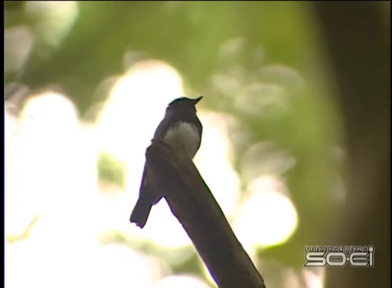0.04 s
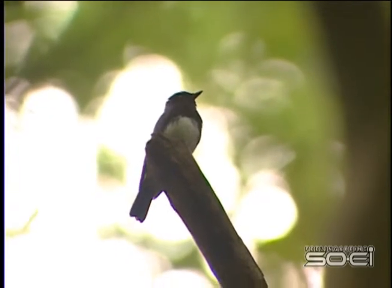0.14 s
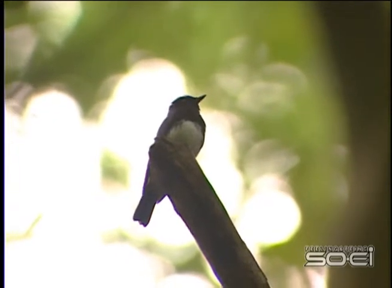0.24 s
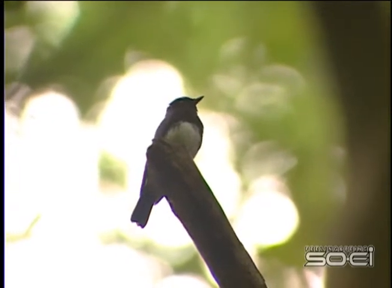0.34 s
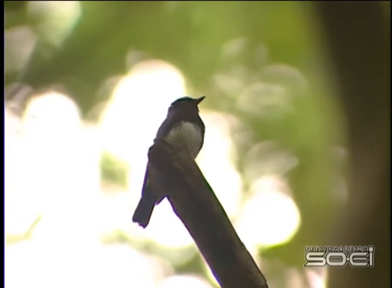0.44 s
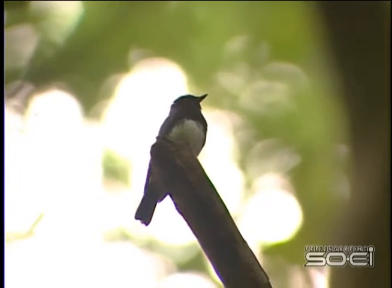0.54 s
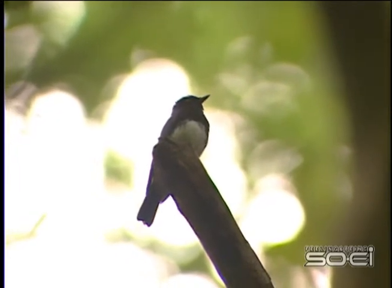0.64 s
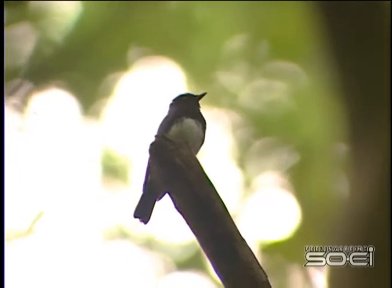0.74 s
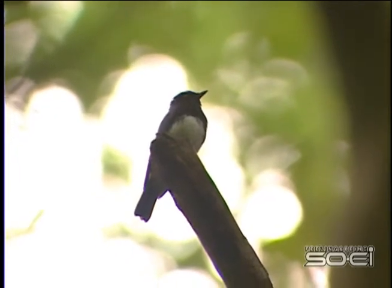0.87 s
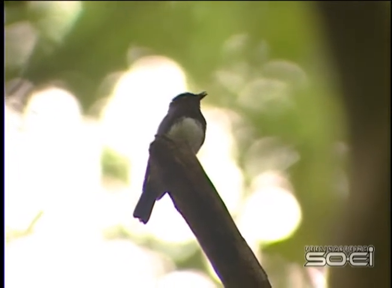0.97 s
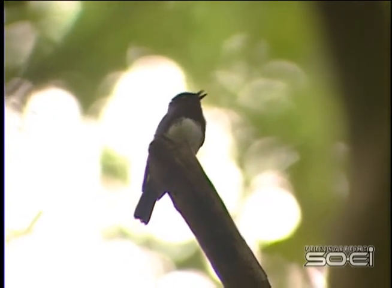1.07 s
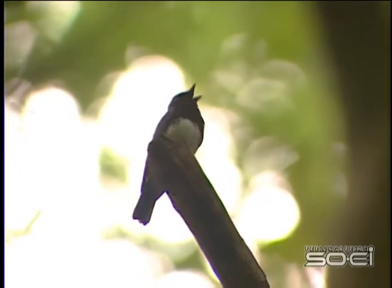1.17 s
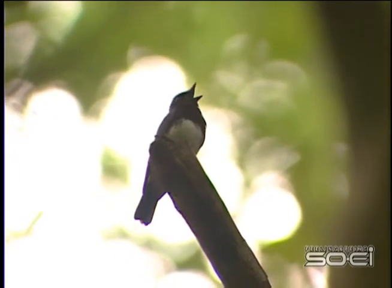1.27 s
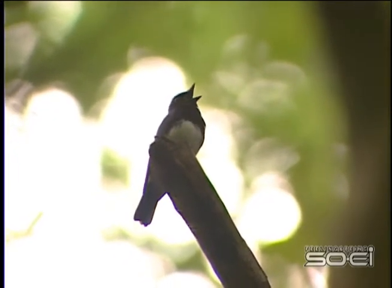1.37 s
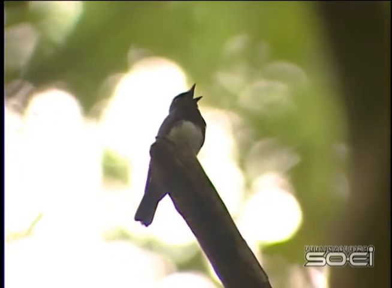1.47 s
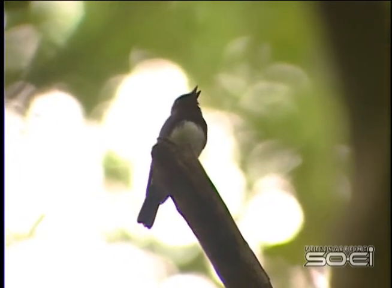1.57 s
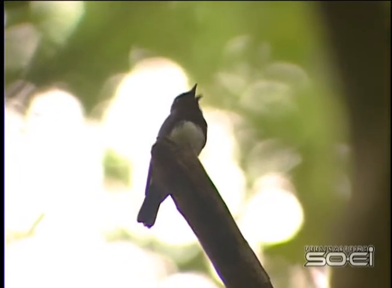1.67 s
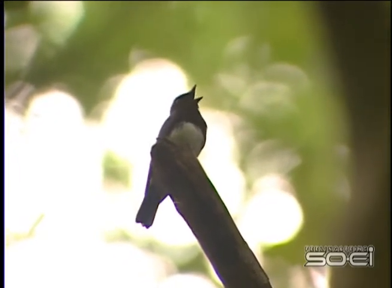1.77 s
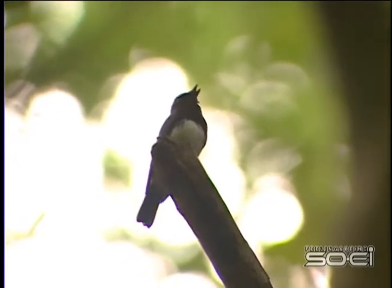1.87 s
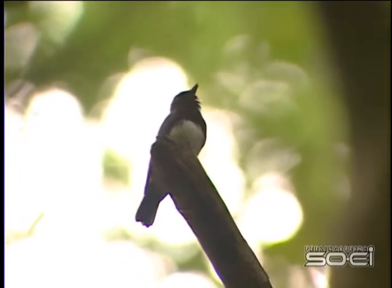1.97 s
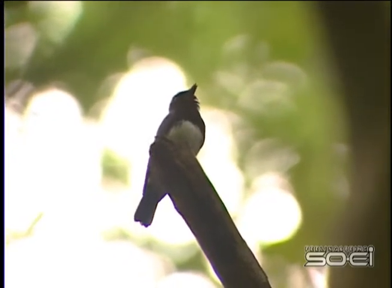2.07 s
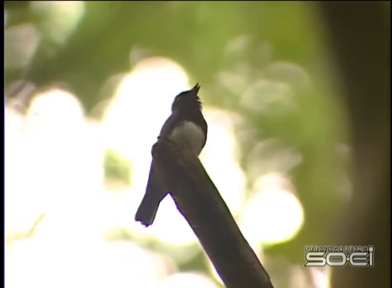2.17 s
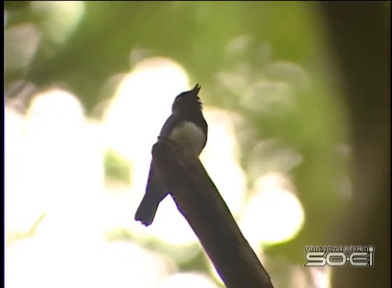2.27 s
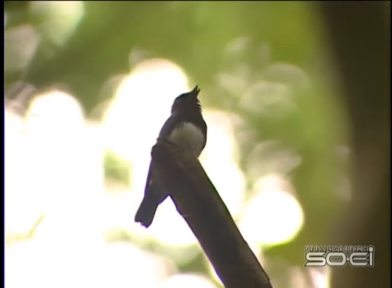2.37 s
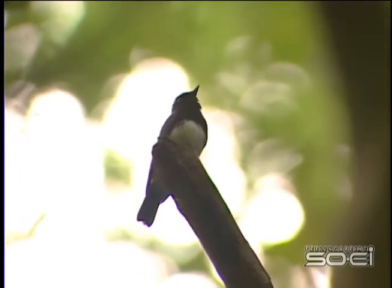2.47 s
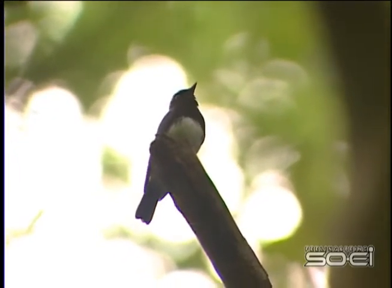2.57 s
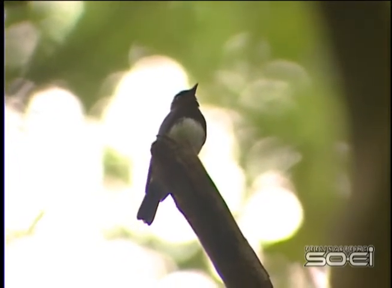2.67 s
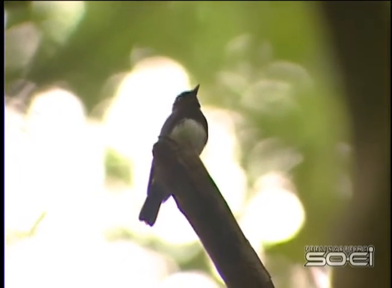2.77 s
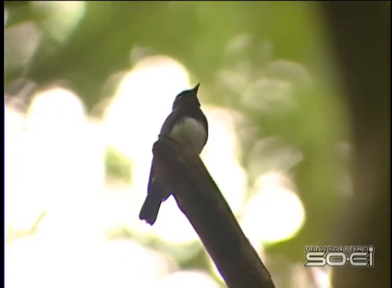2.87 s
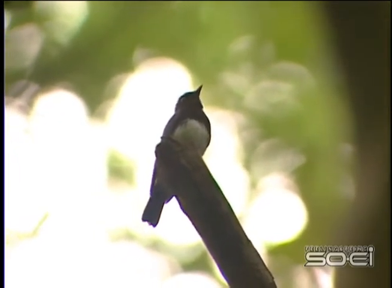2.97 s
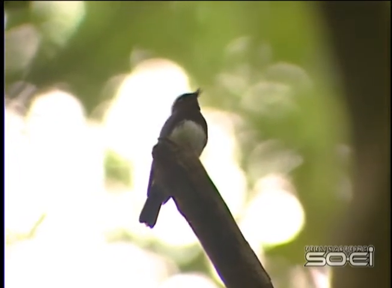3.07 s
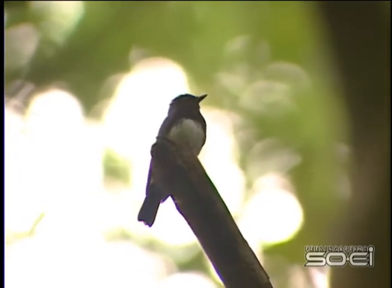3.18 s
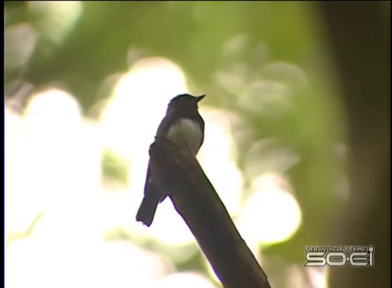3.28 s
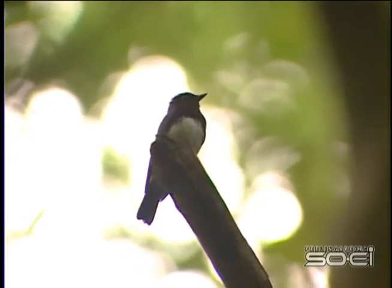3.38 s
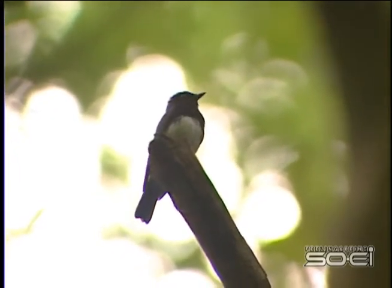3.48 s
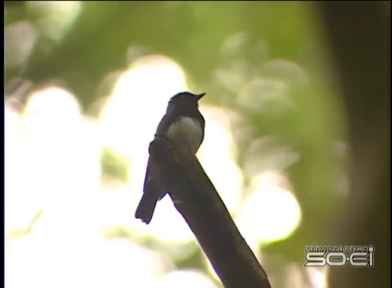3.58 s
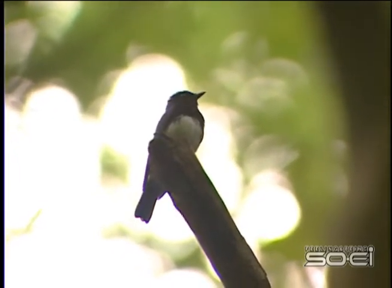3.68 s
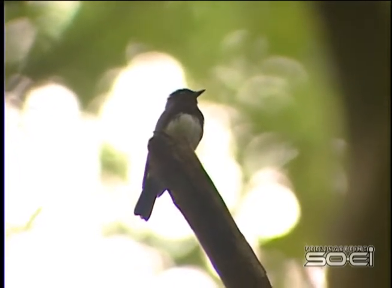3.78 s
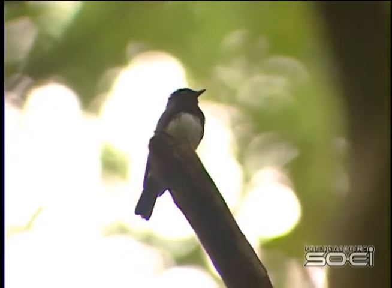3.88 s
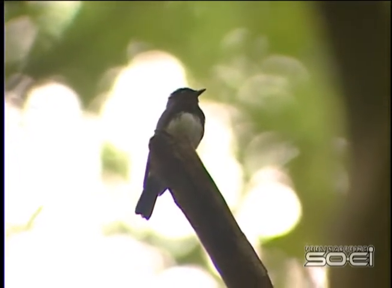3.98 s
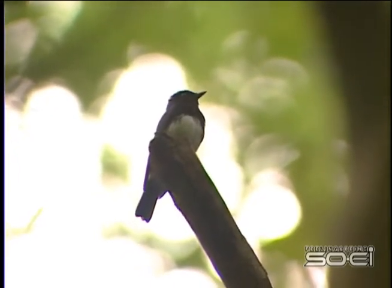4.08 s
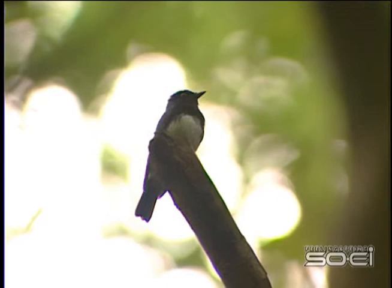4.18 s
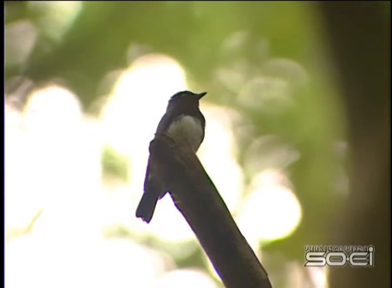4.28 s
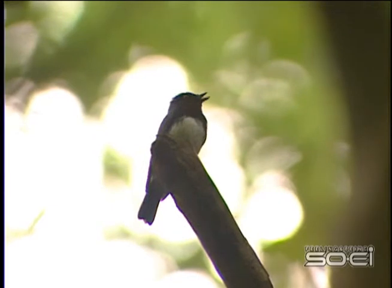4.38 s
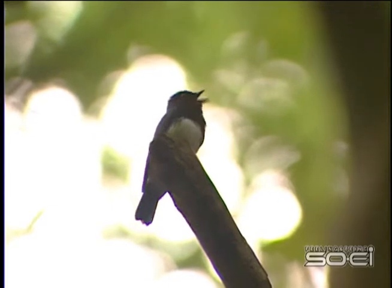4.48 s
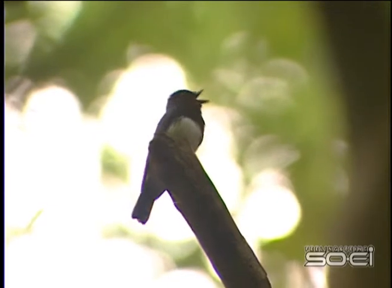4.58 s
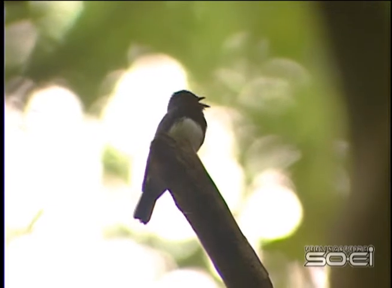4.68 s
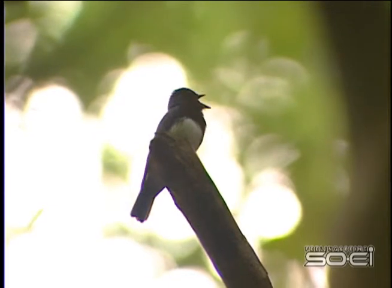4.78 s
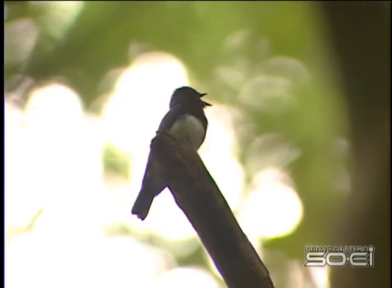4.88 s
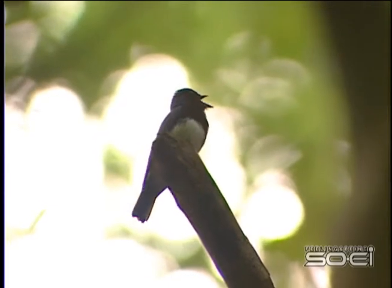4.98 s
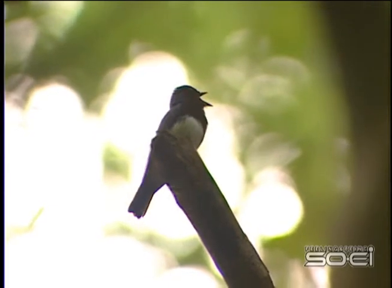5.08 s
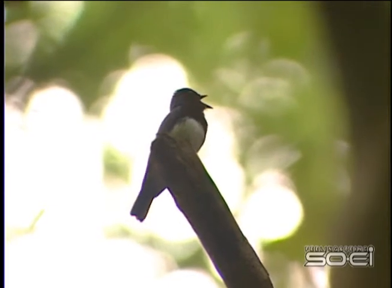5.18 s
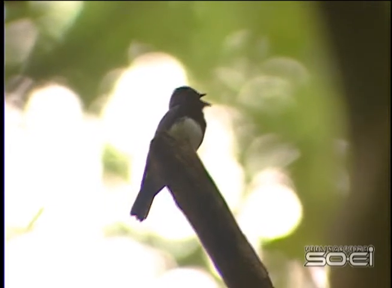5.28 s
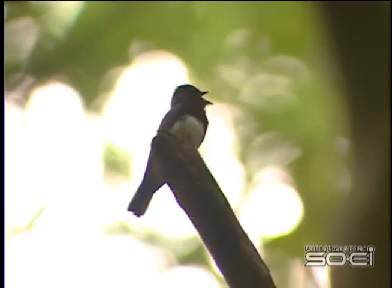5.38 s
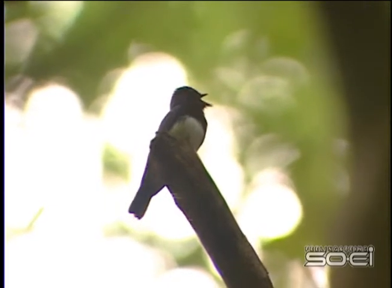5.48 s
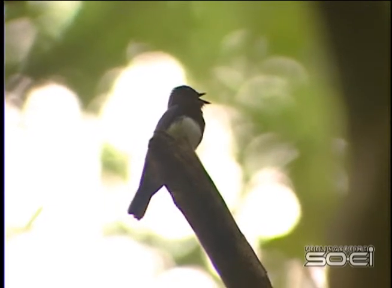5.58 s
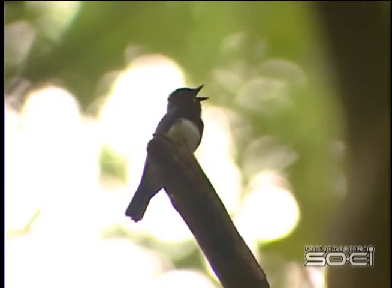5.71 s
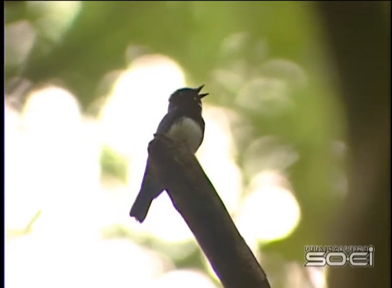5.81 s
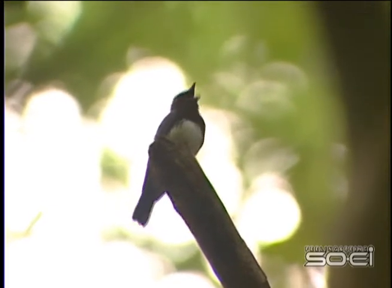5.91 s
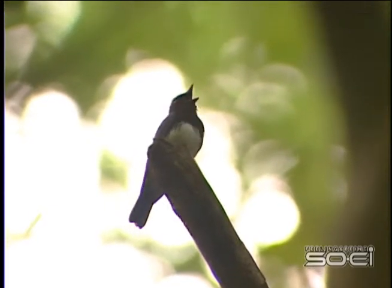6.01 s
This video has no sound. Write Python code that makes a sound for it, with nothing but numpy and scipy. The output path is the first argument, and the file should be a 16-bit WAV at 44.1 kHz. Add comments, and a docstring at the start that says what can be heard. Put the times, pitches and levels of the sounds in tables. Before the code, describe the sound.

A small bird sings in a softly echoing forest: five quick, high rising slurs, then a brief, lower, rough chatter. After a pause it gives five buzzing whistles that step down in pitch. Water gurgles faintly far off under a soft hush, with a few dry ticks. The microphone rumbles and is bumped several times, most clearly during the pause. Nearly everything sits on the left.

```python
"""A flycatcher sings from a forest branch: rising slurs, a low chatter, then five buzzing whistles that
step down. Each note is a gliding near sine from the syrinx, and the trees scatter it into a long tail.
Bubbles gurgle far off and a few dry ticks snap; the microphone rumbles and is bumped a few times.
The forest hush comes up with the input level about a second in. Nearly all the sound sits on the left."""
import sys
import numpy as np
from scipy import signal
from scipy.fft import rfft, irfft
from scipy.io import wavfile
from scipy.ndimage import uniform_filter1d, map_coordinates

SR = 44100
rng = np.random.default_rng(int(sys.argv[2]) if len(sys.argv) > 2 else 0)


def write(x):
    x = np.atleast_2d(x).T
    wavfile.write(sys.argv[1], SR, np.round(np.clip(x, -1, 1) * 32767).astype(np.int16))


N = 266672
TIME = np.arange(N) / SR

# Table levels are relative, ahead of the mix gains.
# rising slurs: start_s, climb_s, hold_s, start_hz, top_hz, level_db, sag_db, accent_db
SLURS = [(1.232, 0.11, 0.0043, 3493, 4840, -35.5, -2, -3), (1.344, .012, 0.0019, 3484, 4987, -31, 11, 9),
         (1.411, 0.065, 0.0056, 3680, 5230, -32, -0.5, 7), (1.557, .063, 0.014, 3777, 5220, -32.5, -1, 3),
         (1.777, .156, 0.0055, 3155, 5080, -30, 3, 0.5)]
# chips of the chatter: start_s, length_s, start_hz, end_hz, level_db
CHIPS = [(2.074, 0.012, 2750, 3880, -35), (2.082, 0.019, 2950, 2500, -36), (2.095, 0.013, 3750, 2430, -40),
         (2.186, 0.023, 3046, 2804, -40.5), (2.229, 0.023, 3085, 3615, -35), (2.252, .011, 3210, 2610, -32),
         (2.271, 0.0119, 2870, 3625, -32), (2.282, 0.0113, 2500, 3170, -41.5),
         (2.295, 0.028, 3222, 3354, -30.5), (2.32, .014, 2395, 3730, -32.5), (2.341, 0.01, 3170, 2370, -40),
         (2.375, .019, 3260, 2924, -32)]
# buzzing whistles: start_s, length_s, base_hz, scoop_hz, rise_hz, hook_hz, level_db, hook_db,
# trill_depth_hz, trill_rate_hz
WHISTLES = [(4.59, .128, 3812, 695, 597, -280, -29, -1, 24, 120.8),
            (4.811, 0.17, 3800, 90.5, 213, 56, -27.5, 5, 95, 107),
            (5.085, 0.19, 3740, 207.4, 245, 139, -27.5, 4.5, 109.8, 103.6),
            (5.372, .211, 3649, 119.5, 182.4, 311, -27.5, 3, 144, 96.36),
            (5.69, 0.19, 3525, 100, 299.5, 135, -29, 6.5, 116, 88.7)]
# overtones of the song: multiple, level_db
OVERTONES = [(2, -43), (3, -42.5), (4, -48)]
# the open beak favours the upper treble: frequency_hz, gain_db
OPEN_BEAK_EQ = [(5400, -0.5), (7500, 5), (10300, 11), (11800, 6.5), (15000, 9)]
# with the head lowered the beak favours the third harmonic: frequency_hz, gain_db
LOWERED_BEAK_EQ = [(5000, -0.5), (7800, -3.5), (11800, 3.5), (15000, -1)]
# rush of air in the song: frequency_hz, gain_db
BREATH_EQ = [(1000, -30), (2500, -3.5), (4000, 18.5), (6000, 4), (9000, -5.5), (12000, -1.5), (15000, -9.5)]
# early reflections off the nearest trunks: delay_s, gain_db
TRUNK_ECHOES = [(.012, -18.5), (.025, -17.5), (.037, -36.5), (0.052, -9.5)]
# the loudest water drops: start_s, level_db, pitch_hz
DROPS = [(1.146, -54, 1000), (1.193, -52, 918), (1.701, -54.5, 1030), (2.411, -52.5, 1110),
         (2.578, -53.5, 963), (2.75, -49, 930), (2.822, -47, 895), (3.965, -48, 870), (4.532, -53, 1056),
         (5.235, -49.5, 770), (5.756, -53.5, 1080)]
# soft thumps on the microphone mount: start_s, level_db, cutoff_hz
THUMPS = [(.866, -30, 55), (1.274, -29.5, 70), (1.407, -27.5, 49), (1.972, -17, 58.6), (2.228, -25, 121),
          (4.05, -17, 84), (4.506, -28, 59)]
# modes of the mount: pitch_hz, level_db, t60_s
MOUNT_MODES = [(31.97, 0.5, 0.44), (59.5, -3, 0.36), (124.6, 0.5, 0.11)]
# light knocks on the microphone housing: start_s, level_db, cutoff_hz, ring_time_ratio
KNOCKS = [(.54, -51, 900, 1.34), (.854, -46, 1000, .7), (0.893, -29, 1300, 1.09), (4.151, -15.5, 220, 0.37)]
# modes of the housing: pitch_hz, level_db, t60_s
HOUSING_MODES = [(143, -8, .1), (245, -12, 0.13), (412, -5, 0.042)]
# faint dry ticks: start_s, level_db
TICKS = [(0.344, -63), (0.541, -61), (0.894, -60.5), (2.462, -43.5), (4.104, -48)]
# colour of the ticks: frequency_hz, gain_db
TICK_EQ = [(300, -52), (1500, 12.5), (4000, 10), (7000, 7), (14000, -27)]
# swells of the rumble, ahead of its ceiling: time_s, level_db
RUMBLE_ENVELOPE = [(0.0, -45.5), (0.18, -59), (0.64, -44), (1.46, -31.5), (1.87, -44), (1.99, -23),
                   (2.21, -40), (2.26, -26.5), (2.63, -40.5), (3.49, -42), (3.71, -33.5), (4.01, -42.5),
                   (4.08, -11), (4.11, -30), (4.28, -49), (4.55, -35.5), (4.85, -47.5), (6.05, -37.5)]
# colour of the rumble: frequency_hz, gain_db
RUMBLE_EQ = [(12, -13.5), (22, -3.5), (38, 8.5), (56, 5), (72, -8.5), (92, -13), (134, -19.5), (165, -35.5),
             (300, -43), (660, -100)]
# colour of the forest air: frequency_hz, gain_db
AIR_EQ = [(50, -5), (95, 11.5), (135, 8.5), (180, 3), (220, 1.5), (300, -3), (410, -3.5), (600, -7),
          (740, -8), (900, -7.5), (1210, -9), (1600, -6.5), (2540, -11), (5000, -12.5), (8000, -18.5),
          (15500, -26)]
# steady hiss of the input: frequency_hz, gain_db
HISS_EQ = [(25, -17.5), (60, -6.5), (90, 3), (125, -19), (220, -12.5), (1000, -17), (2000, -22.5),
           (4500, -26.5), (9000, -31.5), (15000, -50)]
# sensitivity of the right channel against the left: frequency_hz, gain_db
WEAK_SIDE_EQ = [(30, -45), (120, -51.5), (300, -37), (800, -25), (4000, -24.5), (12000, -25)]


def flycatcher():
    """The opening is sung up into the canopy, so it sounds wetter; the whistles with the head lowered."""
    return (forest(from_db(-4.5) * slurs(), scatter_db=-3.5, tail_db=-1.0, scatter_t60_s=0.21)
            + forest(from_db(-8.0) * chatter(), scatter_db=4.0, tail_db=-11.0, scatter_t60_s=0.66)
            + forest(from_db(-4.0) * whistles(), scatter_db=-4.0, tail_db=-3.0, scatter_t60_s=0.37))


def slurs(bow=.7, accent_s=.015):
    """Each slur sweeps up, slows towards its top, holds there a moment and flicks down."""
    out = np.zeros(N)
    for start_s, climb_s, hold_s, start_hz, top_hz, db, sag_db, accent_db in SLURS:
        t, bend_hz, shape_db = gesture(climb_s + hold_s, attack_s=.019, flick_s=.017,
                                       fall_hz=1795, fade_db=23)
        progress = np.minimum(t / climb_s, 1)
        hz = start_hz + (top_hz - start_hz) * progress ** bow + bend_hz
        accent = accent_db * np.exp((progress - 1) * climb_s / accent_s)
        sag = sag_db * np.exp(-((progress - .68) / .18) ** 2)   # the voice slackens or firms on the way
        level_db = db + shape_db + accent - sag
        add(out, start_s, note(hz, level_db, overtone_db=8.0, wander=0.0085, grain=0.19))
    return breathy(eq(out, OPEN_BEAK_EQ), breath_db=-26.0)


def chatter(edge_drop_db=5):
    """Quick rough chips, each a straight glide that is loudest in its middle."""
    out = np.zeros(N)
    for start_s, length_s, start_hz, end_hz, db in CHIPS:
        progress = np.linspace(0, 1, int(length_s * SR))
        hz = start_hz + (end_hz - start_hz) * progress
        arch_db = db - edge_drop_db * (2 * progress - 1) ** 2
        add(out, start_s, note(hz, arch_db, overtone_db=2.0, wander=0.031))
    return breathy(out, breath_db=-18.5)


def whistles(scoop_s=.03, hook_s=.0113, swell_db=3.5, trill_fade=.44, tremolo_db_per_hz=.0011):
    """Each whistle scoops down, rises, swells and hooks on a last push; a fast trill makes it buzz."""
    out = np.zeros(N)
    for start_s, length_s, base_hz, scoop_hz, rise_hz, hook_hz, db, hook_db, depth_hz, rate_hz in WHISTLES:
        t, bend_hz, shape_db = gesture(length_s, attack_s=.025, flick_s=.013, fall_hz=1526, fade_db=33.5)
        progress = np.minimum(t / length_s, 1)
        scoop = np.exp(-t / scoop_s)
        rise = progress ** 2.5
        hook = np.exp((progress - 1) * length_s / hook_s)
        jittered_hz = rate_hz * (1 + .049 * drift(260)[:len(t)])
        swing = np.sin(2 * np.pi * np.cumsum(jittered_hz) / SR)
        trill_hz = depth_hz * (1 - trill_fade * rise ** 2) * swing
        hz = base_hz + scoop_hz * scoop + rise_hz * rise + hook_hz * hook + trill_hz + bend_hz
        accent_db = swell_db * (progress - .5) + hook_db * hook
        level_db = db + shape_db + accent_db - tremolo_db_per_hz * trill_hz
        add(out, start_s, note(hz, level_db, overtone_db=11.0, wander=0.0083))
    return breathy(eq(out, LOWERED_BEAK_EQ), breath_db=-31)


def gesture(length_s, attack_s, flick_s, fall_hz, fade_db, onset_db=-11.5):
    """A note's soft attack and closing downward flick: returns time, pitch bend and level envelope."""
    t = TIME[:int((length_s + flick_s) * SR)]
    onset = np.maximum(1 - t / attack_s, 0)
    flick = np.maximum(t - length_s, 0) / flick_s
    shape_db = onset_db * onset - fade_db * flick ** .59   # drops fastest as the flick begins
    return t, -fall_hz * flick, shape_db


def note(hz, db, overtone_db, wander, grain=0.38, edge_s=.0007):
    """One note from the syrinx: a near sine that follows a pitch and a level, wavering slightly."""
    t = TIME[:len(hz)]
    waver_knots, flicker_knots = rng.standard_normal((2, 400))
    waver = map_coordinates(waver_knots, [t * 260], order=2, mode="wrap")
    phase = 2 * np.pi * np.cumsum(hz * (1 + wander * waver)) / SR
    overtones = sum(from_db(level_db + overtone_db) * np.sin(multiple * phase)
                    for multiple, level_db in OVERTONES)
    # the weak overtones come and go, which makes them husky
    husk = 0.38 + grain * np.interp(t * 900, np.arange(400), flicker_knots)
    tone = np.sin(phase) + husk * overtones
    edges = np.clip(np.minimum(t, t[-1] - t) / edge_s, 0, 1)
    return np.sqrt(2) * tone * edges * from_db(db)


def breathy(song, breath_db):
    """Layer in a faint rush of air that follows the song's envelope."""
    envelope = np.sqrt(np.abs(uniform_filter1d(song ** 2, size=200)))
    return song + from_db(breath_db) * envelope * noise(BREATH_EQ)


def forest(x, scatter_db, tail_db, scatter_t60_s, tail_t60_s=.93, build_s=.0039):
    """Stereo forest reverb: direct sound, trunk echoes, quick scatter from the leaves and a long tail."""
    t, sides = TIME[:2 * SR], []
    for near, far in rng.standard_normal((2, 2, len(t))) * (1 - np.exp(-t / build_s)):
        scatter = from_db(scatter_db) * rms_one(near * from_db(-60 * t / scatter_t60_s))
        tail = from_db(tail_db) * rms_one(far * from_db(-60 * t / tail_t60_s))
        response = (scatter + tail) / np.sqrt(len(t))
        response[0] = 1   # direct sound
        for delay_s, db in TRUNK_ECHOES:
            add(response, delay_s, from_db([db]))
        sides.append(signal.fftconvolve(x, response)[:N])
    return np.array(sides)


def water(faint_count=130, from_s=.96, span_s=5.0, attack_s=.00069, t60_s=.047):
    """Distant gurgles: bubbles ring briefly and rise in pitch, a few loud ones among many faint."""
    bubbles = list(DROPS)
    for when, size, pitch in rng.random((faint_count, 3)):
        octaves = .99 * (pitch - .5) * (1 - size / 2)
        bubbles.append((from_s + span_s * when, -66 + 10 * size ** 2, 1000 * 2 ** octaves))
    t, out = TIME[:SR // 8], np.zeros(N)
    envelope = from_db(-60 * t / t60_s) * (1 - np.exp(-t / attack_s))
    for start_s, db, hz in bubbles:
        chirp = np.sin(2 * np.pi * hz * t * (1 + 0.77 * t))
        add(out, start_s, from_db(db + 2.5) * envelope * chirp)
    return forest(out, scatter_db=-12.5, tail_db=-26.0, scatter_t60_s=0.24)


def bumps():
    """Handling noise: thumps shake the microphone mount; knocks ring its housing."""
    out = np.zeros(N)
    for start_s, db, cutoff_hz in THUMPS:
        add(out, start_s, from_db(db) * struck(MOUNT_MODES, cutoff_hz))
    for start_s, db, cutoff_hz, ring_time_ratio in KNOCKS:
        add(out, start_s, from_db(db) * struck(HOUSING_MODES, cutoff_hz, ring_time_ratio))
    return out


def struck(modes, cutoff_hz, ring_time_ratio=1):
    """The ring of a body after one hit; a soft hit reaches only its low modes."""
    t = TIME[:SR // 2]
    ring = sum((-1) ** k * from_db(db - 60 * t / (t60_s * ring_time_ratio)) * np.sin(2 * np.pi * hz * t)
               for k, (hz, db, t60_s) in enumerate(modes))
    return signal.sosfilt(signal.butter(2, cutoff_hz, fs=SR, output="sos"), ring)


def ticks(t60_s=.025):
    """Tiny dry snaps: bright noise with an instant attack and a fast decay."""
    t, envelope = TIME[:SR // 20], np.zeros(N)
    for start_s, db in TICKS:
        add(envelope, start_s, from_db(db - 60 * t / t60_s))
    return envelope * noise(TICK_EQ) / 2


def rumble(ceiling_db=-30, trim_db=-2.1):
    """The mount trembles in the low end, swelling and sinking."""
    shake = noise(RUMBLE_EQ)
    shake /= np.sqrt(uniform_filter1d(shake ** 2, size=5000) + 1e-9)   # even out the noise's own swells
    times_s, levels_db = np.transpose(RUMBLE_ENVELOPE)
    swell_db = np.interp(TIME, times_s, levels_db)
    return shake * from_db(np.minimum(swell_db, ceiling_db) + trim_db)


def air(level_db=-58.5, flicker_db=.6):
    """The bed of forest hush fades in and holds, with one brief dip; its treble flickers slightly."""
    hush = np.array([noise(AIR_EQ), noise(AIR_EQ)])
    treble = eq(hush, [(2000, -49), (5000, 7)])
    flicker = from_db(flicker_db * drift(40)) - 1
    fade_db = np.interp(TIME, [.75, 1.22], [-16.5, 0])
    dip_db = -4 * np.exp(-((TIME - 4.085) / .04) ** 2)
    return from_db(level_db + fade_db + dip_db) * (hush + treble * flicker)


def from_db(db):
    """Decibels to gain."""
    return 10 ** (np.asarray(db) / 20)


def rms_one(x):
    """Scale to rms 1."""
    return x / np.sqrt(np.mean(x ** 2) + 1e-20)


def eq(x, curve):
    """Filter by a curve of frequency_hz, gain_db points."""
    hz, db = np.transpose(curve)
    bins_hz = np.maximum(np.arange(N // 2 + 1) * SR / N, 1)
    gain = from_db(np.interp(np.log(bins_hz), np.log(hz), db))
    return irfft(rfft(x) * gain, N)


def noise(curve):
    """Noise coloured by an EQ curve, rms 1."""
    return rms_one(eq(rng.standard_normal(N), curve))


def drift(rate_hz):
    """Smooth random modulation, spread about 1."""
    knots = rng.standard_normal(8192)
    return map_coordinates(knots, [TIME * rate_hz], order=2, mode="wrap")


def add(out, start_s, sound):
    """Mix a short sound in at a given time."""
    start = int(np.clip(start_s * SR, 0, N - 1))
    out[start:start + len(sound)] += sound[:N - start]


def scene():
    """The left channel carries the mix and the right hears it faintly; input hiss lies under both."""
    left, right = 2 * (flycatcher() + water() + bumps() + ticks() + rumble() + air())
    hiss = from_db(-76.5) * np.array([noise(HISS_EQ), noise(HISS_EQ)])
    return np.array([left, eq(right, WEAK_SIDE_EQ)]) + hiss


def record(dry, cutoff_hz=15800):
    """A steep low-pass takes off the very top."""
    return signal.sosfilt(signal.ellip(16, .1, 90, cutoff_hz, fs=SR, output="sos"), dry)


dry = scene()
out = record(dry)
write(out)
```